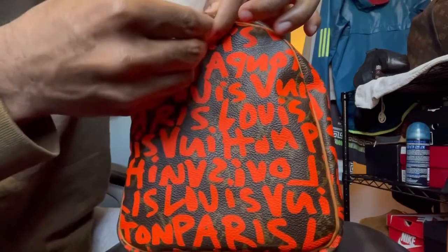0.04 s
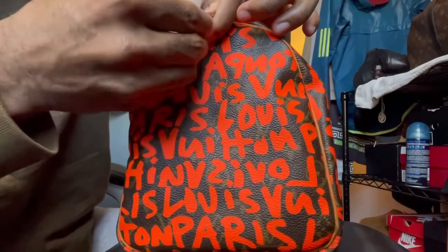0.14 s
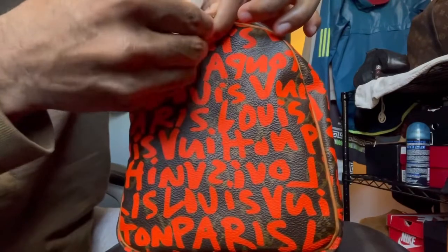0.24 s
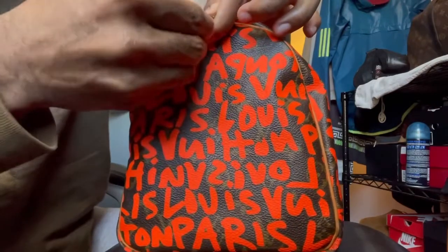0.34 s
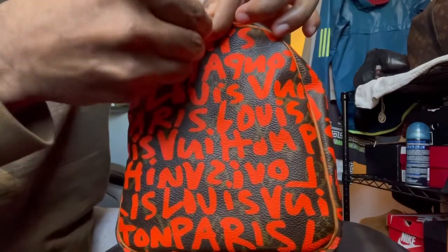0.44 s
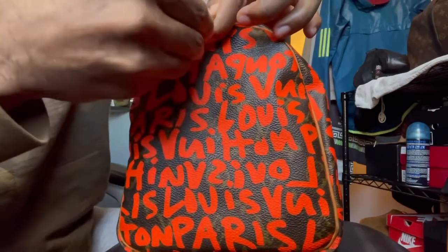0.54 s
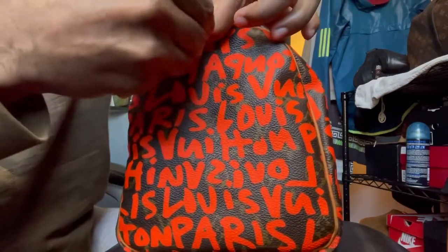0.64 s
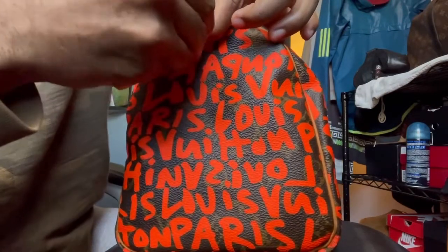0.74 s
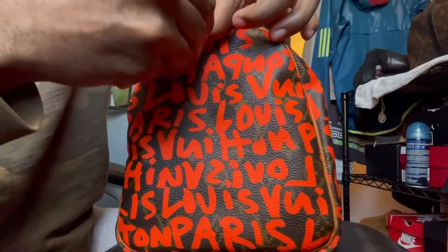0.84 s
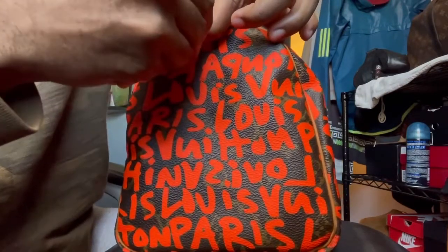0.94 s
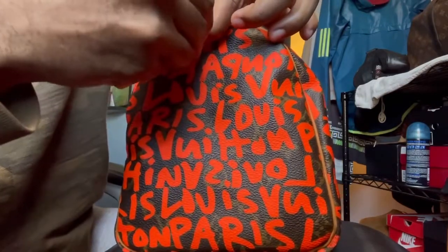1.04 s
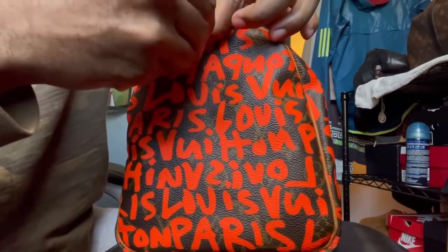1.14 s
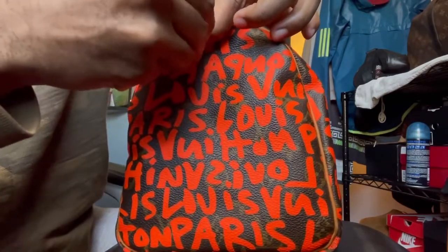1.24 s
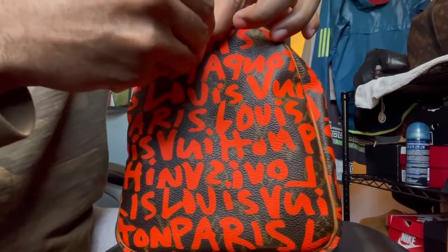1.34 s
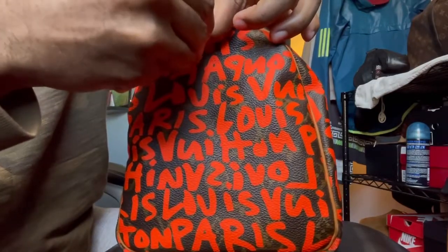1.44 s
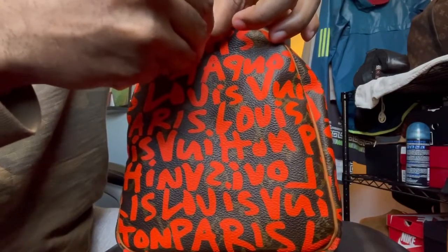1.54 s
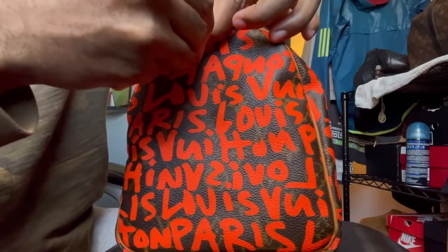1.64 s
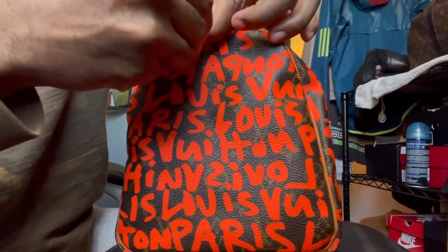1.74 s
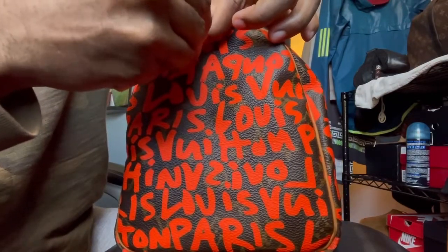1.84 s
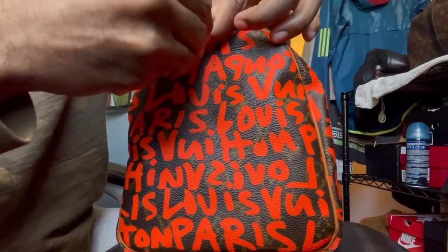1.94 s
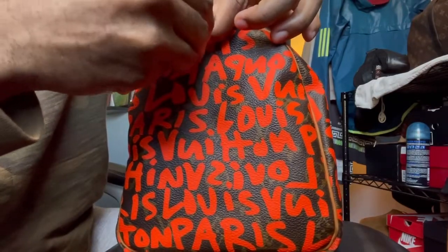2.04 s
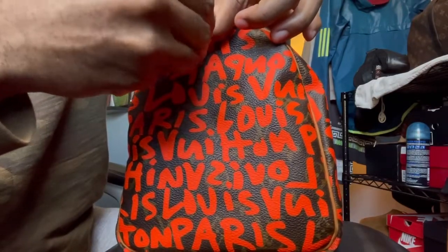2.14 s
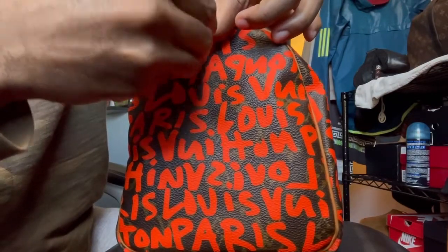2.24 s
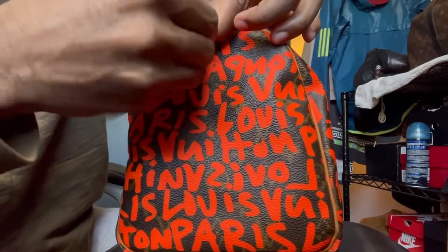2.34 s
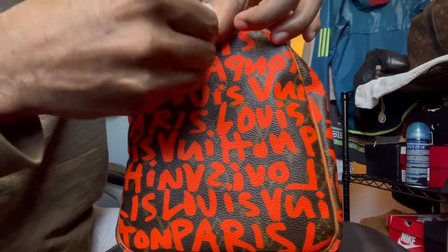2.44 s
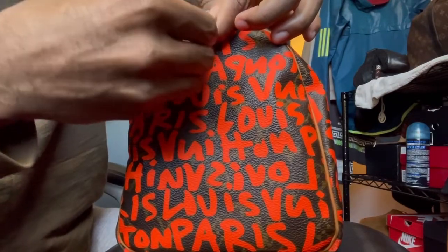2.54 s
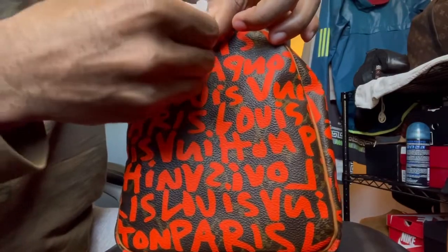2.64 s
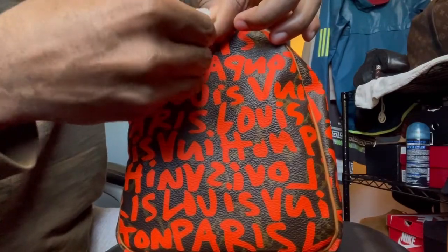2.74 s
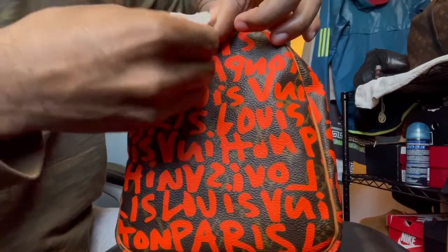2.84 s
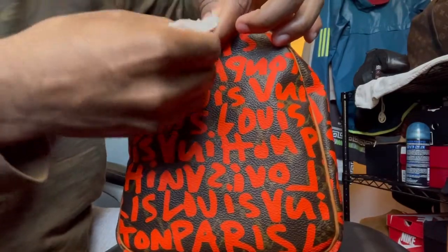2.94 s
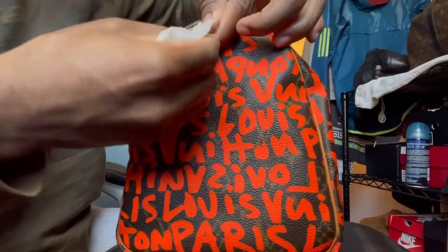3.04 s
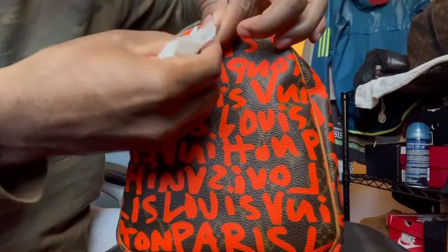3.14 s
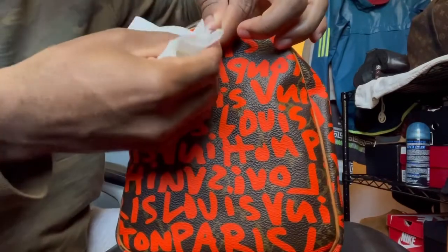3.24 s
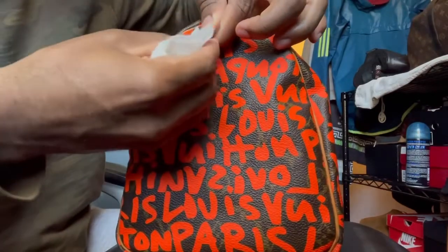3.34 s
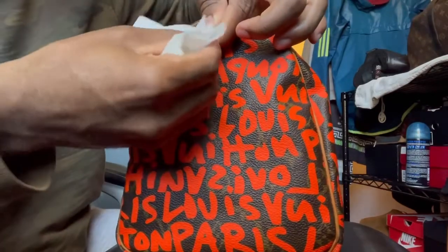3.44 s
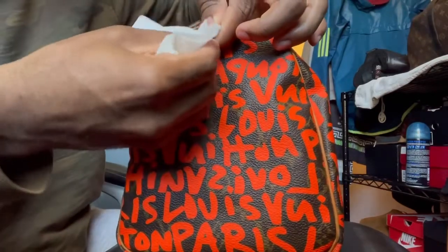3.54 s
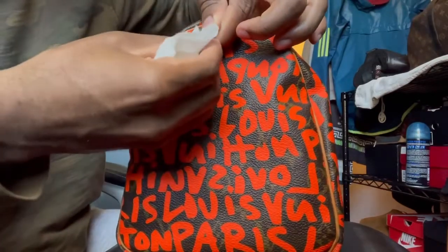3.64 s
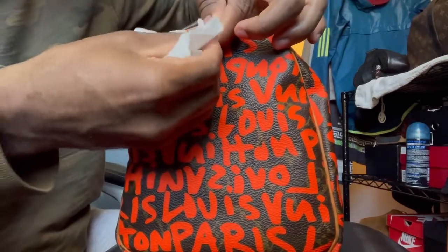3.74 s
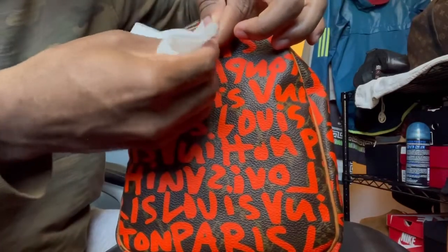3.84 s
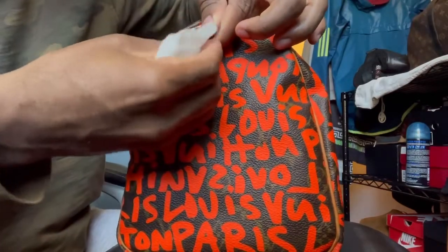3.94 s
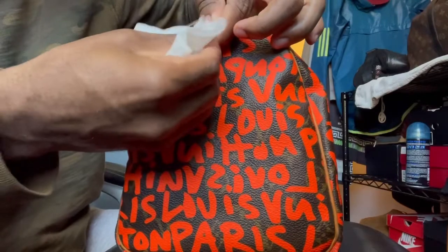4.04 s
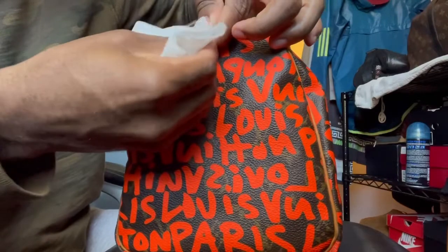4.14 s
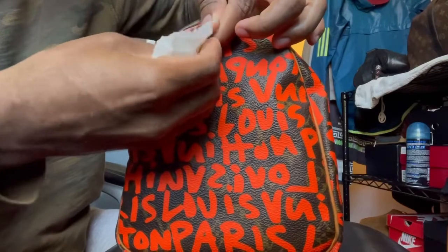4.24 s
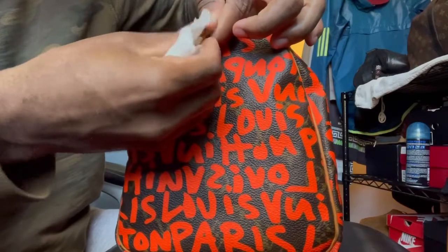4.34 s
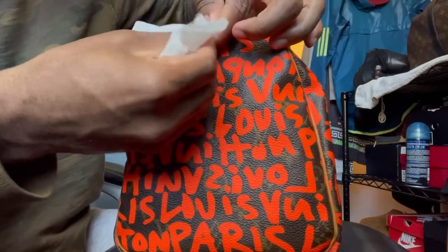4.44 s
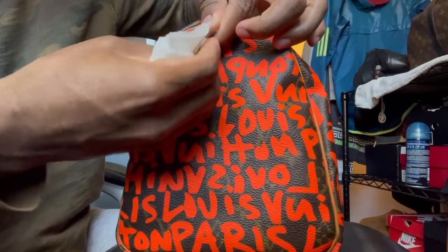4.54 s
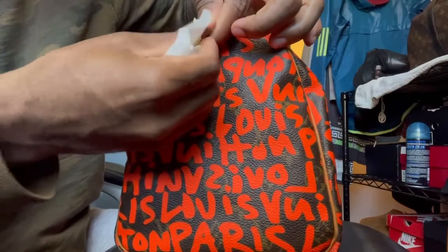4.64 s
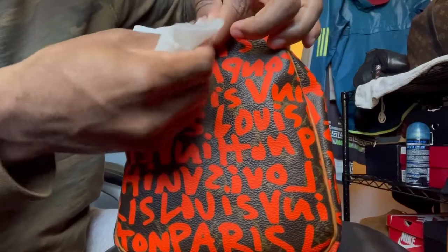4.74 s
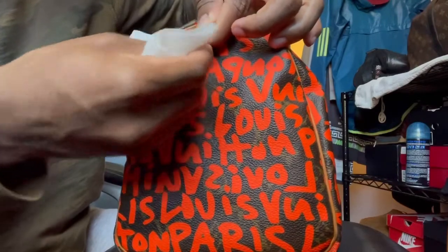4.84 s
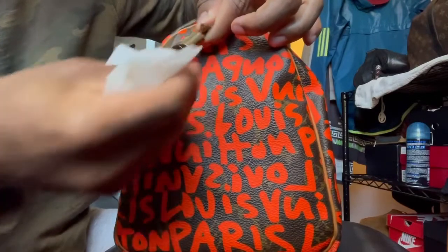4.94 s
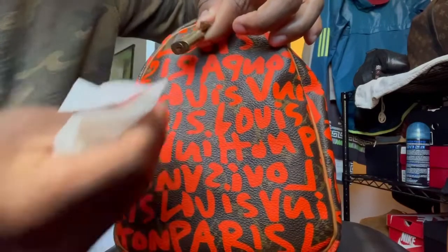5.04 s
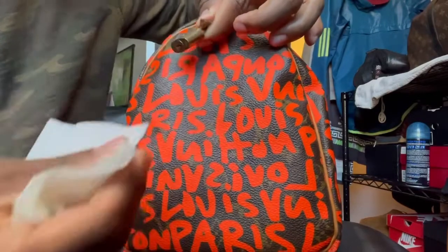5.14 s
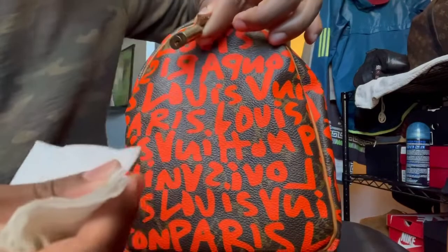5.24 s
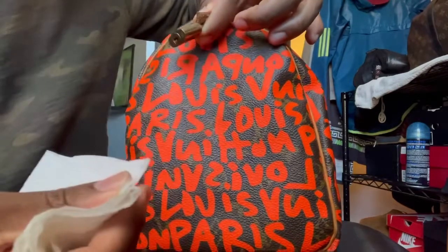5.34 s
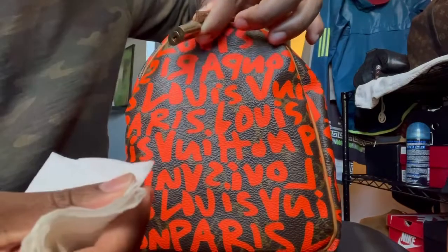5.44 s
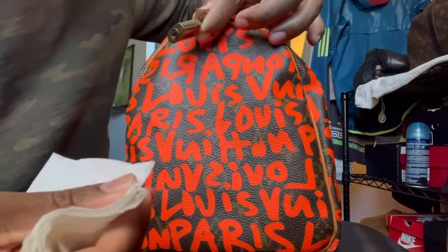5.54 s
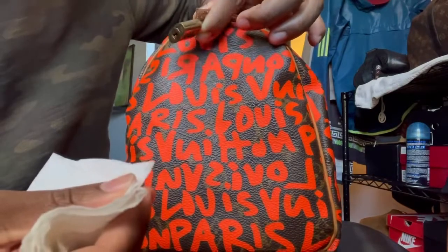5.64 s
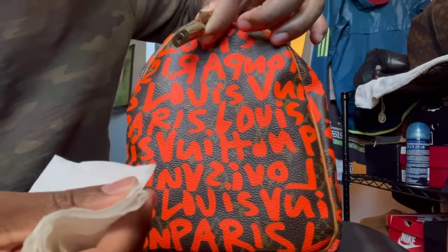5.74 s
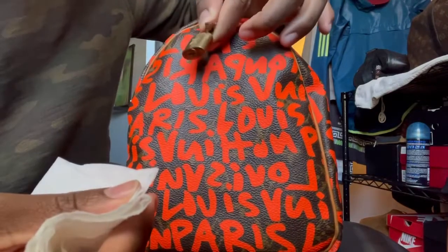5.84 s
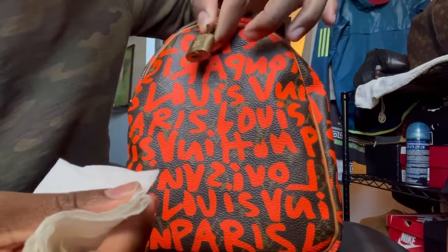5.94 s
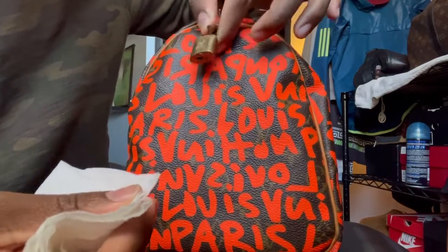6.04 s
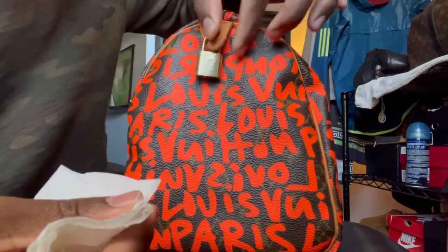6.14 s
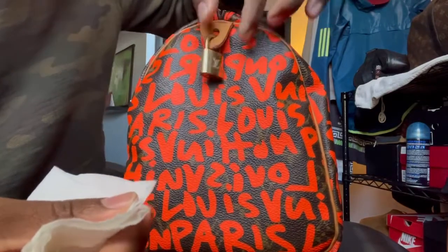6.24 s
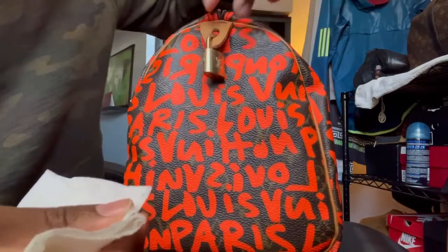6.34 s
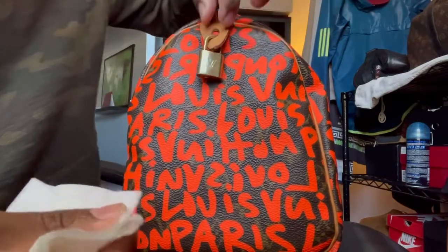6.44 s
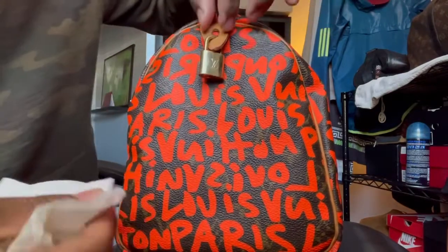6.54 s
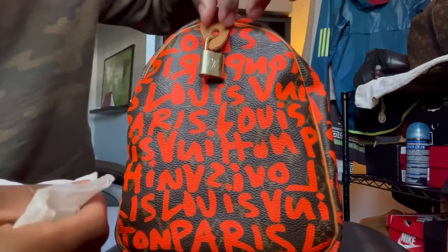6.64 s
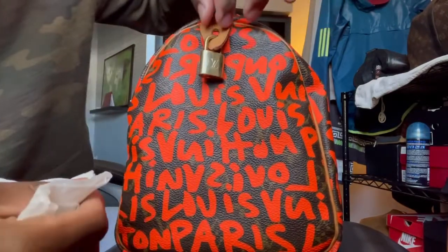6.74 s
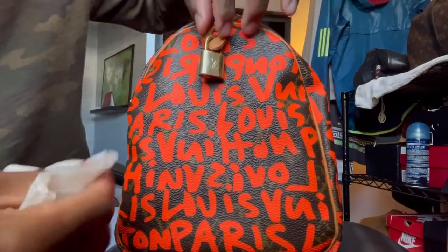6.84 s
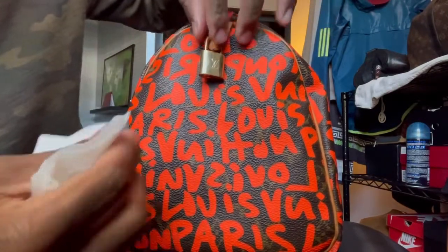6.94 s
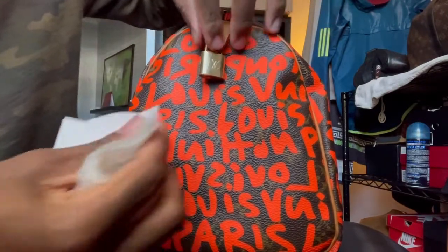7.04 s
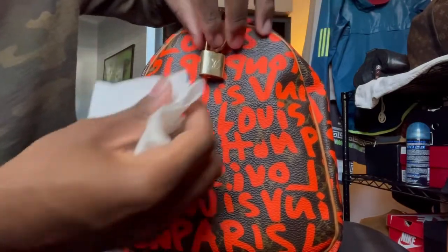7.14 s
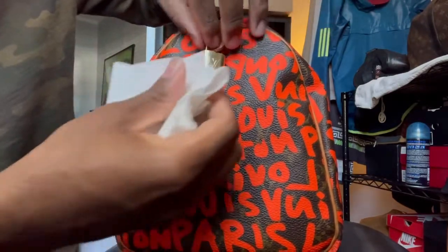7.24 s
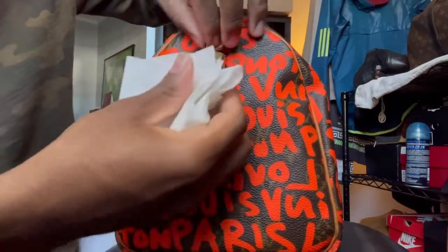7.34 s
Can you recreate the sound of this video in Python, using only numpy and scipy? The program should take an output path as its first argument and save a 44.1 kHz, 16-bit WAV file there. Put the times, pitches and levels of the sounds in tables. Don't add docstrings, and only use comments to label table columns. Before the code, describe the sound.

Close papery scuffs build into steady hissing rubs, pause, then a sharp metallic knock lands on a stiff bag in a quiet rumbling room.

```python
import sys
import numpy as np
from scipy import signal
from scipy.fft import rfft, irfft, next_fast_len
from scipy.io import wavfile

SR = 44100
rng = np.random.default_rng(int(sys.argv[2]) if len(sys.argv) > 2 else 0)


def transcribe(signal):
    frames = np.atleast_2d(signal).T
    limited = np.clip(frames, -1, 1)
    pcm = np.round(limited * 32767).astype(np.int16)
    wavfile.write(sys.argv[1], SR, pcm)


def voltage_ratio(decibels):
    exponent = np.asarray(decibels, float) / 20
    return 10 ** exponent


N = 326337
HZ = np.maximum(np.fft.rfftfreq(next_fast_len(N), 1 / SR), 1)


# (frequency [Hz], level per Hz [dB])
HISS = [(2500, -65), (4900, -24), (5400, 16), (6100, 20.5), (6700, 23), (7700, 27.5), (9000, 29),
        (12000, -47)]
# (frequency [Hz], level per Hz [dB])
FIZZ = [(5000, -63), (8000, -9), (9500, 4), (11000, 2.5), (13000, 2), (15000, 5.5), (16300, 5.5),
        (18000, -38)]
# (frequency [Hz], level per Hz [dB])
SCRATCH = [(1400, -68), (2500, -5.5), (2760, 4.5), (3050, -5.5), (3600, -0.5), (4050, -1), (4600, -2.5),
           (5200, -6.5), (8000, -47)]
# (frequency [Hz], level per Hz [dB])
DRAG = [(300, -50), (600, -3.5), (820, -13), (1060, 0), (1350, -7), (1650, 0), (1950, -8.5), (2250, -6),
        (3100, -19.5), (6000, -64)]
# (centre time [s], half-power length [s], level [dB], coarseness [dB])
DABS = [(0.006, 0.046, -69.0, 1.5), (0.149, 0.047, -70.5, 4.5), (0.346, 0.096, -80.0, 0.5),
        (0.425, 0.041, -72.5, 3), (0.574, 0.093, -82.5, 2), (0.736, 0.052, -76.5, 5.5),
        (0.855, 0.023, -76, 3), (0.885, 0.028, -80, -2.5), (1.025, 0.04, -85, 2),
        (1.155, 0.074, -93.5, -1.5), (1.307, 0.031, -79.5, 6), (1.431, 0.043, -82.0, 5),
        (1.57, 0.046, -91, 8), (1.707, 0.044, -75.5, 2.5), (1.836, 0.067, -81.5, 1), (1.994, 0.035, -85, 1),
        (2.156, 0.044, -74.5, 2), (2.26, 0.091, -86.5, 9.5), (2.346, 0.043, -74, 3),
        (2.463, 0.042, -73, 2.5), (2.588, 0.038, -62.5, 2.5), (2.709, 0.062, -71.0, 3),
        (2.725, 0.22, -93.5, 8)]
# (centre time [s], half-power length [s], level [dB], coarseness [dB])
POLISH = [(2.9, 0.058, -76.5, 2), (2.998, 0.062, -71.5, 2), (3.13, 0.049, -68, -2), (3.147, 0.15, -77.5, 4),
          (3.235, 0.071, -69.5, 2), (3.392, 0.05, -66.5, 1.5), (3.471, 0.041, -61, -5),
          (3.538, 0.15, -70.5, 1), (3.674, 0.05, -64.5, 2), (3.776, 0.057, -60.5, -5.5),
          (3.85, 0.07, -68, 2.5), (4.013, 0.11, -63.0, 2), (4.065, 0.029, -59, -4), (4.18, 0.071, -65.5, 2),
          (4.305, 0.063, -62.5, 2.5), (4.403, 0.058, -59, -3), (4.49, 0.077, -65, 3),
          (4.617, 0.065, -63.5, 2), (4.707, 0.044, -58.0, -3.5), (4.802, 0.063, -67.5, 2)]
# (centre time [s], half-power length [s], level [dB], coarseness [dB])
REFOLD = [(4.946, 0.062, -78.5, 2), (5.106, 0.14, -87, 0), (5.17, 0.26, -85, 2.5),
          (5.546, 0.39, -93.5, 2.5), (5.93, 0.077, -87, -6), (6.06, 0.063, -76.0, -7.5),
          (6.134, 0.049, -79, 4.5), (6.223, 0.081, -88, 4.5), (6.45, 0.012, -76, 2),
          (6.542, 0.19, -85, 1.5), (6.874, 0.089, -73, -1.5), (6.973, 0.07, -77, 3.5),
          (7.108, 0.16, -69.5, -0.5), (7.25, 0.066, -71, -1.5), (7.36, 0.098, -68.0, 0.5)]


def towel():
    s, length, level_db, coarse_db = np.transpose(DABS + POLISH + REFOLD)
    soft_db = -75 - level_db

    hiss_db = swells(s, length, level_db + 0.25)
    fizz_db = swells(s, length, level_db + 1.5 - 0.2 * coarse_db + 0.03 * soft_db)
    scratch_db = swells(s, 1.05 * length, level_db - 4.0 + 1.04 * coarse_db + 0.034 * soft_db)
    drag_db = swells(s, 1.075 * length, level_db + 2.5 + 0.7 * coarse_db + 0.24 * soft_db)

    rub = fibres(HISS, hiss_db, rest_db=-93.5, per_s=9000, size_db=3.5, clump_db=0.5)
    rub = rub + fibres(FIZZ, fizz_db, rest_db=-91.5, per_s=15000, size_db=2.5, clump_db=1.7)
    rub = rub + fibres(SCRATCH, scratch_db, rest_db=-97.5, per_s=1800, size_db=3.5, clump_db=2.0)
    rub = rub + fibres(DRAG, drag_db, rest_db=-97, per_s=900, size_db=3.0, clump_db=2.0)
    rub = rub + swishes()
    shielding = voltage_ratio(2.1 * drift(6))
    return ports(rub[0], rub[1:] * shielding)


def fibres(spectrum, level_db, rest_db, per_s, size_db, clump_db):
    caught = rng.random(N) < per_s / SR
    sizes = voltage_ratio(size_db * np.minimum(rng.exponential(1, N), 5)) * rng.choice([-1, 1], N)
    direct = rms_one(caught * sizes)
    reflected = rng.standard_normal((2, N))
    source = np.vstack([direct, reflected])
    gain = np.hypot(voltage_ratio(level_db + clump_db * drift(27)), voltage_ratio(rest_db))
    return rms_one(shape(source, voltage_ratio(at_hz(spectrum)))) * gain


# (centre time [s], length [s], level [dB], centre frequency [Hz], width [Hz])
SWISHES = [(5.17, 0.4, -88, 5700, 1200), (5.18, 0.4, -83, 11800, 1100), (5.7, 0.11, -102, 7200, 1500),
           (7.099, .2, -70.5, 2500, 1000), (2.585, 0.065, -58, 667, 72), (6.722, 0.0061, -70, 3000, 2600),
           (3.1, .06, -81, 1900, 770), (.55, 0.22, -85.5, 11800, 1100), (.58, 0.16, -85, 4200, 900),
           (1.05, .022, -78.5, 4440, 1300), (5.49, .05, -80, 2500, 600), (5.28, .07, -80, 2200, 2000),
           (6.81, 0.1, -72.5, 2030, 1200), (4.83, 0.041, -62, 2100, 1400), (5.912, .012, -79, 11000, 7300)]


def swishes():
    out = np.zeros((3, N))
    for s, length, level_db, hz, width in SWISHES:
        start, size = int((s - length / 2) * SR), int(length * SR)
        band = signal.butter(2, [hz - width / 2, hz + width / 2], "band", fs=SR, output="sos")
        noise = signal.sosfilt(band, rng.standard_normal((3, SR // 2)))[:, :size]
        bell = np.hanning(noise.shape[1])
        out[:, start:start + size] += voltage_ratio(level_db + 2.5) * rms_one(noise) * bell
    return out


# (frequency [Hz], level [dB], time to fall 60 dB [s])
BRASS = [(2520, 12, 0.0036), (3750, -10.5, 0.021), (4100, -6, 0.0058), (5130, -12.5, 0.0041),
         (6240, -3.5, 0.0034), (7340, -10.5, 0.0066), (8350, -6, 0.0042), (10300, -8, 0.0023),
         (12200, -14, .003), (13600, -16, 0.0032), (15200, -13, 0.0033)]
# (frequency [Hz], left level [dB], right level [dB], time to fall 60 dB [s])
WALL = [(588, -5, 10, 0.035), (695, -10, 4, 0.036), (1073, -0.5, 6.5, 0.015), (1630, -9.5, -8, 0.01),
        (2210, -13, -19, 0.015)]
# (frequency [Hz], left level [dB], right level [dB], time to fall 60 dB [s])
BAG = [(70.3, -9.5, -2.5, 0.16), (115, -3.5, 0, 0.065), (180.3, -2.5, 4.5, 0.1), (252.7, 8, 4.5, 0.059),
       (306, 9.5, 6, 0.016)]
# (time [s], thud peak [dB], clack [dB], tick [dB], hardness [dB per octave])
KNOCKS = [(0.395, -62, -51, -80, 6), (0.707, -43.5, -43.5, -66, 4.5), (0.728, -51, -72, -78, 4),
          (0.757, -44.5, -52.5, -70, 15), (1.05, -41.5, -47, -87, 0), (1.432, -50, -63, -78, -3),
          (1.699, -47, -52, -82, 3), (2.191, -51, -65, -80, 1), (2.577, -59, -61, -73, 1),
          (3.398, -46.5, -64, -72, 1), (5.091, -53, -56.5, -62.5, 12), (5.678, -59, -66, -87, 0),
          (5.889, -52, -74, -81, 8), (6.113, -17, -29, -34, 4), (6.2135, -34, -41, -53, -1.5),
          (6.442, -52, -59, -79, -1), (6.719, -51, -64, -72, 15), (6.834, -46.5, -56, -72, -3),
          (6.995, -51.5, -67, -59, 8), (7.317, -47.5, -56, -69, 7), (7.343, -36, -43, -67, 4.5)]


def lock():
    s, thud_db, clack_db, tick_db, hardness_db = np.transpose(KNOCKS)
    tick_tilt_db = 4 + 0.25 * hardness_db

    tick = np.zeros(N)
    for k, (hz, db, t60) in enumerate(BRASS):
        clicks = strikes(tick_db + db + 5.5 + tick_tilt_db * np.log2(hz / 6000), 0.5)
        tick = tick + (-1) ** k * ring(clicks, hz, t60)

    clack = body(WALL, clack_db - 2.5, hardness_db, 0.5)
    soft = signal.butter(2, 303, fs=SR, output="sos")
    thud = signal.sosfilt(soft, body(BAG, thud_db - 0.6, 0, 0.3))
    return ports(tick, room_tail(tick)) + clack + thud


def room_tail(tick):
    room_t60_s, room_db = 0.056, -10
    fall = voltage_ratio(-60 / (room_t60_s * SR))
    energy = signal.lfilter([1 - fall ** 2], [1, -fall ** 2], tick ** 2)
    noise = shape(rng.standard_normal((2, N)), 1 / np.hypot(1, HZ / 5000))
    return voltage_ratio(room_db) * np.sqrt(energy) * noise


def body(modes, level_db, tilt_db, spread_db):
    out = np.zeros((2, N))
    for k, (hz, left_db, right_db, t60) in enumerate(modes):
        sides = voltage_ratio(np.array([[left_db], [right_db]]))
        clicks = strikes(level_db + tilt_db * np.log2(hz / 1200), spread_db)
        out = out + (-1) ** k * sides * ring(clicks, hz, t60)
    return out


def strikes(level_db, spread_db):
    clicks = np.zeros(N)
    places = (np.array(KNOCKS)[:, 0] * SR).astype(int)
    clicks[places] = voltage_ratio(level_db + spread_db * rng.standard_normal(len(KNOCKS)))
    return clicks


def ring(clicks, hz, t60):
    r, w = voltage_ratio(-60 / (t60 * SR)), 2 * np.pi * hz / SR
    return signal.lfilter([0, np.sin(w)], [1, -2 * r * np.cos(w), r * r], clicks + 1e-18)


# (frequency [Hz], level [dB])
SCATTER = [(500, -7), (2000, -0.5), (3000, 1), (4200, -1.5), (5800, 6), (7300, -7), (8500, -18.5),
           (15000, -28)]
# (frequency [Hz], left minus right [dB])
PORT_BALANCE = [(60, 33), (110, 8), (200, 2), (380, -28), (700, -6), (1290, -2.5), (2380, -3.5),
                (4400, -6.5), (8120, -0.5), (15000, 0.5)]


def ports(direct, scattered):
    lag_s = 7.64 / 44100
    late = np.exp(-2j * np.pi * (np.abs(HZ * lag_s - 1) - 1))
    tilt = voltage_ratio(at_hz(PORT_BALANCE) / 2)
    pair = np.array([shape(direct, tilt), shape(direct, late / tilt)])
    return pair + shape(scattered, voltage_ratio(at_hz(SCATTER)) * np.array([tilt, 1 / tilt]))


# (time [s], swell [dB])
STREET = [(0, -1), (.7, -1), (1.3, -1.5), (1.95, -1.5), (2.4, -1), (2.85, 0), (3.44, 1.5), (3.9, 1.5),
          (4.35, 3), (4.9, 2.5), (5.5, 0.5), (6.1, 1), (6.6, -0.5), (7.1, -2), (7.4, 2)]
# (time [s], level [dB])
ENGINE = [(0, -67), (.5, -58), (1.5, -66), (2.5, -59), (3.2, -63.5), (3.75, -77), (4.3, -57), (4.78, -48.5),
          (5.2, -57.5), (5.56, -53.5), (6.0, -60), (6.5, -63.5), (7.4, -65.5)]
# (frequency [Hz], width [Hz], level [dB])
DRONE = [(101.3, 8.2, -1.5), (146, 9.9, -10.5), (182.6, 15, -8), (229, 5.9, -14.5), (300.8, 17.8, -3.5),
         (580.5, 15, -14.5), (805, 270, -31)]
# (centre time [s], half-power length [s], level [dB])
SHUDDERS = [
    (.55, 0.13, -57),
    (1.264, 0.18, -47),
    (1.8, 0.2, -60),
    (3.516, 0.22, -50.5),
    (4.2, 0.47, -57),
    (5, 0.1, -51.5),
    (5.364, 0.077, -55),
    (5.723, 0.13, -51.5),
    (7.202, 0.12, -48.5),
]
# (frequency [Hz], level per Hz [dB])
DEEP = [(12, -29), (28, -12), (40, 12), (55, 18.5), (66, 21), (80, -6.5), (100, -47), (200, -100)]
# (frequency [Hz], level per Hz [dB])
RUMBLE = [(25, -68), (55, -26), (75, 3), (100, 12), (130, 0.5), (230, -1.5), (280, -15.5), (400, -47),
          (800, -100)]
# (frequency [Hz], level per Hz [dB])
AIR = [(80, -41), (200, -6.5), (300, -11), (390, -13.5), (460, -12), (660, -17.5), (750, -30.5),
       (850, -34.5), (1060, -22), (1250, -33), (1600, -38.5), (2100, -52.5), (4000, -56), (8000, -110)]


def room():
    (swell_db,), (engine_db,) = in_time(STREET), in_time(ENGINE)
    shudder = np.hypot(voltage_ratio(swells(*np.transpose(SHUDDERS))), voltage_ratio(-56.5))
    deep = shudder * wide_noise(voltage_ratio(at_hz(DEEP)))
    rumble = voltage_ratio(-53 + swell_db + 0.93 * drift(3.8)) * wide_noise(voltage_ratio(at_hz(RUMBLE)))
    air = voltage_ratio(-56.5 + swell_db + 1.5 * drift(8.4)) * wide_noise(voltage_ratio(at_hz(AIR)))
    bands = sum(voltage_ratio(db) / np.hypot(1, ((HZ - hz) / width * 2) ** 2) for hz, width, db in DRONE)
    engine = voltage_ratio(engine_db) * wide_noise(bands)
    return (deep + rumble + air + engine) * voltage_ratio(np.array([[-0.7], [0.7]]))


# (frequency [Hz], left-right likeness [-1 to 1])
LIKENESS = [(30, 0.99), (130, 0.91), (290, 0.59), (640, 0.21), (1400, 0.48), (3000, 0.2), (15000, 0.27)]


def wide_noise(response):
    mid, side = rng.standard_normal((2, N))
    alike = np.clip(at_hz(LIKENESS), -1, 1)
    mid = shape(mid, response * np.sqrt(1 + alike))
    side = shape(side, response * np.sqrt(1 - alike))
    return rms_one(np.array([mid + side, mid - side]))


def swells(s, length, level_db):
    t = np.arange(0, N + 64, 64) / SR
    bells = 0.5 ** ((2 * (t - s[:, None]) / length[:, None]) ** 2)
    power = voltage_ratio(2 * level_db[:, None]) * bells
    return np.interp(np.arange(N) / SR, t, 10 * np.log10(power.sum(axis=0) + 1e-12))


def drift(rate):
    r = np.exp(-2 * np.pi * rate / SR)
    slow = signal.lfilter([1], [1, -2 * r, r * r], rng.standard_normal(N + SR))
    return rms_one(slow[SR:])


def rms_one(x):
    return x / np.sqrt(np.mean(x ** 2) + 1e-20)


def in_time(rows):
    s, *columns = np.transpose(rows)
    return [np.interp(np.arange(N) / SR, s, c) for c in columns]


def at_hz(points):
    hz, value = np.transpose(points)
    return np.interp(np.log(HZ), np.log(hz), value)


def shape(x, response):
    return irfft(rfft(x, next_fast_len(N)) * response, next_fast_len(N))[..., :N]


def scene():
    return towel() + lock() + room()


def top_cut(x):
    return signal.sosfilt(signal.butter(12, 15770, fs=SR, output="sos"), x)


def record(dry):
    top_hz = 15735
    mix = shape(dry, 1 / np.hypot(1, (HZ / top_hz) ** 190.0))
    return top_cut(mix)


dry = scene()
out = record(dry)
transcribe(out)
```